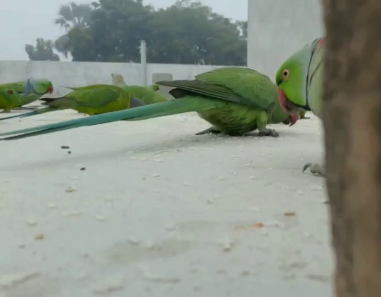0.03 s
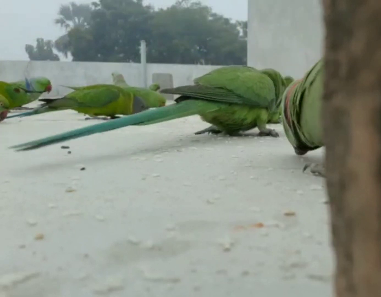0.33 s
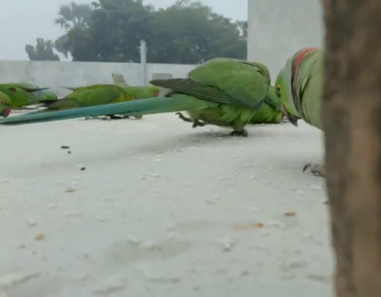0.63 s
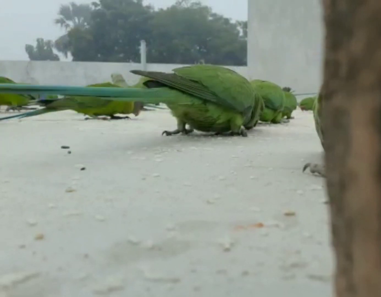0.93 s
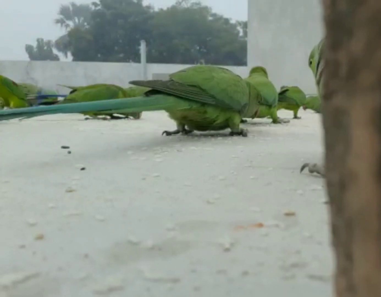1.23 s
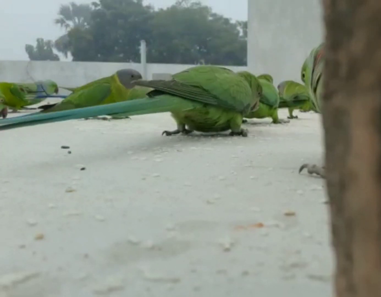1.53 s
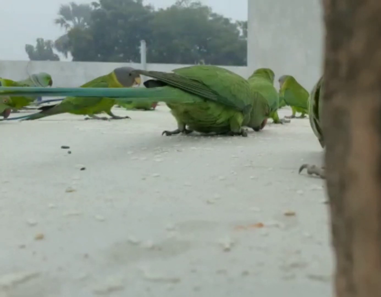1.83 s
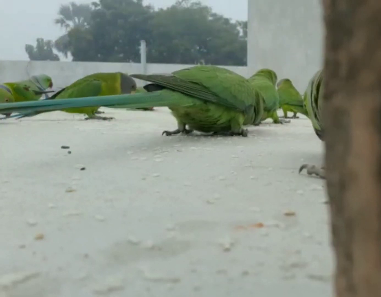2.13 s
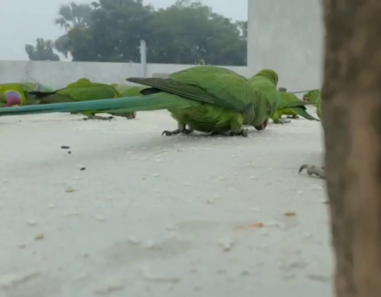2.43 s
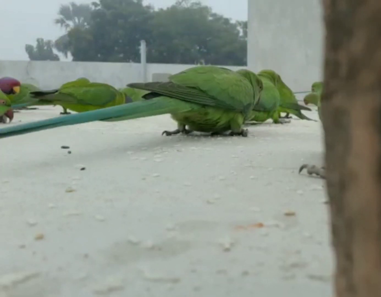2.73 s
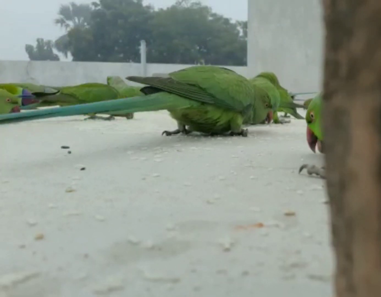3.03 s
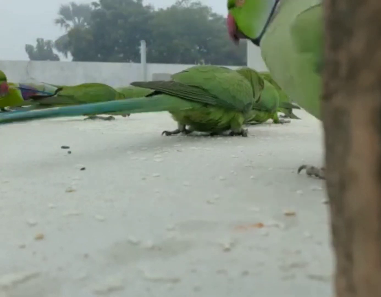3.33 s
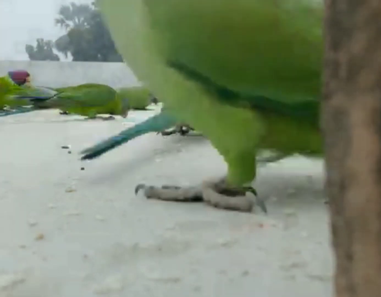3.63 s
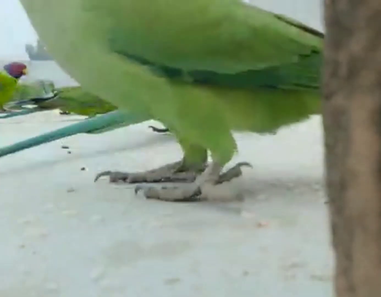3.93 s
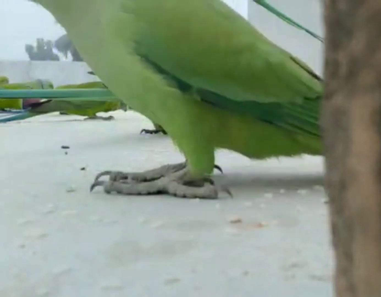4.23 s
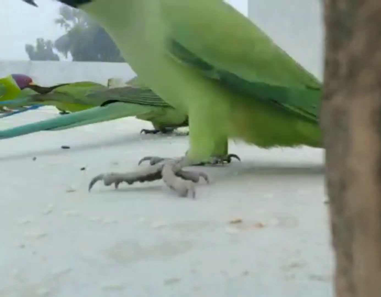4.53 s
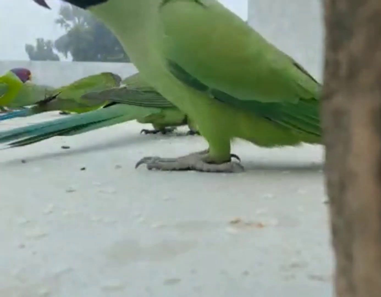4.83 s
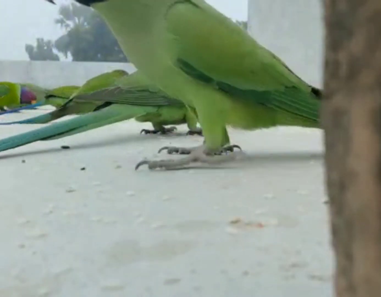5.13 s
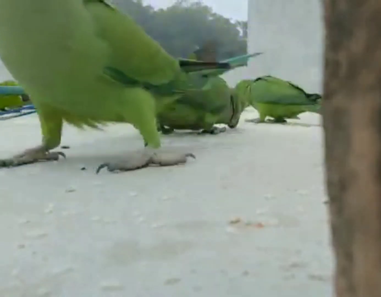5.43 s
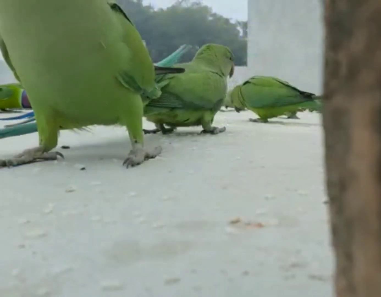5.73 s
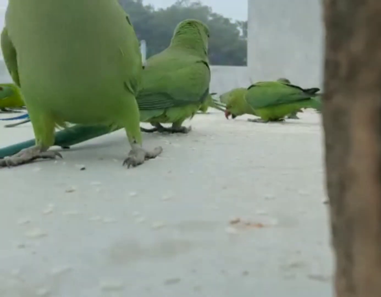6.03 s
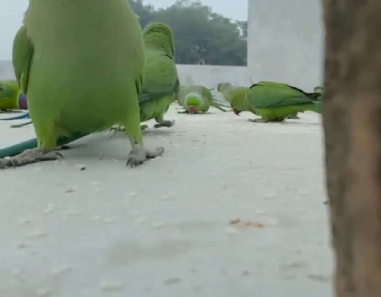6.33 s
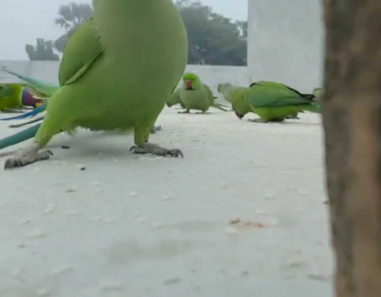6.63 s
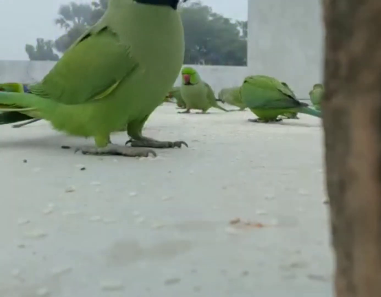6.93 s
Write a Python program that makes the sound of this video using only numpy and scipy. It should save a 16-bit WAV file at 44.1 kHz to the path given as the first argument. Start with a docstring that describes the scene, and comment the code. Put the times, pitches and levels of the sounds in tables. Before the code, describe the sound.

Soft, hoarse parakeet warbles and a short hiss open over a gentle outdoor breeze and dry ticks of beaks and claws on a hard floor. Three short squawks sweep upward with a slight wall echo, followed by hissing and trilling. Midway, wings flap close to the microphone in dull whooshes with feather crackle and low puffs of air. More ticks, a hiss and brief chirps finish, over a faint distant hum.

```python
"""Parakeets feed on a concrete terrace in a light breeze. From the start one hisses and warbles softly,
its syrinx tones coloured by the throat; beaks crack seeds and claws tick throughout. A foot scuffs at
0.8 s. At 1.1-1.7 s, over a faint far drone, another bird gives three rising squawks that echo off walls.
A hiss, trills and quavers follow at 1.9-2.8 s. Wings flutter past in bouts at 3.1-4.9 s, stirring the air.
Near 6 s a second drone swells, and a last hiss leads into more warbled notes."""
import sys
import numpy as np
from scipy import signal
from scipy.fft import rfft, irfft
from scipy.io import wavfile
from scipy.ndimage import uniform_filter1d

SR = 44100
rng = np.random.default_rng(int(sys.argv[2]) if len(sys.argv) > 2 else 0)


def inscribe(sig):
    """Save sig as 16-bit PCM at rate SR to the path in sys.argv[1].

    A 1-D sig is mono; a 2-D sig holds one channel per row.
    Samples are clipped to [-1, 1] before scaling.
    """
    pcm = np.round(np.clip(np.atleast_2d(sig).T, -1, 1) * 32767)
    wavfile.write(sys.argv[1], SR, pcm.astype(np.int16))


N = 307818
TIME_S, FREQS_HZ = np.arange(N) / SR, np.fft.rfftfreq(N, 1 / SR)

# Two directions at the mic ports. Each row: frequency in Hz, left lead in radians, left over right in dB.
FROM_FLOOR = [(526, 0.5, 1), (879, -0.05, 6.5), (998, 4, 7), (1292, 3.5, -0.5), (1377, 3.5, 5.5),
              (1545, 2, 0.5), (2430, 0.87, -1), (3170, -2, 1), (4000, -1.5, -0.5), (5580, -2, 0),
              (5830, 2.5, 1.5), (7700, 0.37, 1), (9370, 2.5, 0), (11300, 1.5, -7)]
FROM_SQUAWKER = [(503, 4, -4), (810, -0.9, 5), (1075, 3, 6), (1740, 4, -5.5), (1940, 3.5, 0),
                 (2560, 4.5, -8), (2650, 3.5, -2), (3600, 5, 6.5), (4680, 10, -7.5), (4380, 15, -8),
                 (4500, 11, 7), (5330, 8.5, -1.5), (6150, 4.5, -2), (6600, 2, 1), (10600, 0.45, -4.5)]
# Wall reflections. Each row: delay in seconds, relative level in dB, right-port lag in seconds.
WALL_ECHOES = [(.015, -6, 0.027), (.025, -15, -0.0098), (.036, -42, -0.024), (.045, -43, .0003),
               (.072, -24, 0.0078), (.078, -22, 0.0074), (0.086, -21.5, 0)]
# Breeze strength. Each row: time in seconds, relative level in dB.
BREEZE = [(0, -1), (.7, 3), (2.4, -3), (3.0, 4.5), (4.7, -2.5), (5.4, -12.5), (6.35, -7.5), (6.98, -3.5)]
# Low, mid and high band of the air. Each row: level in dB, dB per dB of breeze, wake level at full
# flapping in dB, wake exponent, lumpiness in dB.
AIR_BANDS = [(-58.5, 1.5, -35.5, 1.17, 3.5), (-51.5, 0.31, -41, 1.02, 3.5), (-60, 0.29, -53, 0.26, 1.5)]
# Spectrum of the air. Each row: frequency in Hz, gain in dB.
AIR_COLOUR = [(15, -38), (25, -9), (101, -5), (207, -7), (354, -1.5), (790, 1.5), (1280, -6), (1500, -3.5),
              (2370, -12), (3350, -19), (3830, -19), (6200, -25.5), (7500, -24.5), (9300, -28.5),
              (11500, -28), (15000, -27)]
# Hisses. Each row: start, peak and end in seconds, peak level in dB, whistle's share of power 0-1.
HISSES = [(0, 0.04, 0.18, -33, 0.02), (1.88, 2, 2.8, -32.5, 0.15), (5.948, 6, 6.24, -35, 0.55)]
# Resonances of the hissing throat. Each row: frequency in Hz, width in Hz, gain in dB.
HISS_MODES = [(1035, 550, 4), (1480, 344, 12.5), (1500, 50, -12)]
# Warbled notes. Each row: start and length in seconds, first, middle and last pitch in Hz, level in dB,
# tilt in dB per harmonic.
NOTES = [(.107, 0.0077, 930, 790, 860, -22, -6.5), (.114, 0.052, 624, 466, 326, -32, -1.5),
         (.114, 0.013, 1910, 1895, 1750, -26.5, -27), (.37, .11, 589, 498, 472, -35.5, -3),
         (.42, 0.037, 992, 591, 700, -28, -10), (.577, .018, 550, 740, 990, -30.5, -7),
         (.682, 0.02, 695, 690, 1080, -34, -14), (.724, 0.071, 732, 510, 620, -37, -7),
         (2.284, 0.012, 1302, 1034, 956, -28, -5.5), (2.305, 0.016, 1295, 1080, 810, -27.5, -8),
         (2.327, 0.022, 1910, 2090, 1760, -37.5, -5), (2.389, 0.033, 2260, 1910, 2380, -29.5, -11),
         (2.481, 0.035, 1485, 1504, 1445, -30.5, -4.5), (2.539, 0.044, 1357, 1050, 870, -29, -5.5),
         (2.578, 0.021, 900, 818, 730, -27, -14), (2.596, .043, 753, 700, 875, -36.5, -11.5),
         (2.692, 0.084, 805, 630, 904, -35.5, -14), (3.069, 0.017, 940, 855, 840, -38, -16),
         (5.271, .0093, 830, 810, 895, -39.5, -29), (5.448, 0.018, 740, 670, 660, -42, -11),
         (6.138, 0.016, 905, 622, 1290, -13, -4.5), (6.1537, 0.02, 1650, 1755, 1600, -18, -27),
         (6.488, 0.04, 844, 464.5, 730, -30, -5.5), (6.527, 0.035, 837, 788, 720, -38, -7.5),
         (6.749, 0.0091, 613, 745, 900, -38.5, -7), (6.805, 0.033, 1258, 691.5, 480, -29.5, -2.5),
         (6.944, .036, 469, 853, 1270, -30.5, -2)]
# Runs of falling pips. Each row: first and last pip in seconds, pips per second, pitch in Hz,
# fall per pip in octaves, level in dB.
TRILLS = [(2.017, 2.133, 81, 830, .15, -34.5), (2.208, 2.264, 54, 1060, 0.86, -32)]
# Notes with repeated pitch dips. Each row: start and length in seconds, top, first dip and last dip in Hz,
# first and last level in dB, tilt in dB per harmonic.
QUAVERS = [(2.354, .037, 1623, 991, 717, -26, -22.5, -9), (2.424, .058, 1644, 1518, 1047, -25.5, -21.5, -3)]
# Each bird's throat and beak filter, and its syrinx airflow. Each row: frequency in Hz, gain in dB.
WARBLE_THROAT = [(300, 4), (700, 5.5), (1000, 10.5), (1500, 8.5), (2300, 0), (2800, -8.5), (3300, 0.5),
                 (3900, -18), (4600, -7), (5600, -12), (7500, -10), (10000, -35)]
WARBLE_RUSH = [(150, -50), (450, -13), (900, 3), (2200, -9), (3000, -5), (5000, -17), (7800, -11),
               (10000, -28), (14000, -35)]
SQUAWK_THROAT = [(700, -4), (1600, 6.5), (3200, 4.5), (4100, 9.5), (4700, 0.5), (5300, -1), (5750, -12.5),
                 (6300, 3.5), (7200, -2.5), (8400, -4), (9500, -13.5), (10800, 0.5), (12200, -4),
                 (14000, -55)]
SQUAWK_RUSH = [(200, -40), (600, -12), (1300, -12), (2500, -17), (4000, -12), (5500, -7), (7500, 4),
               (9500, -13), (11500, -12), (14000, -39)]
# Seed cracks and claw ticks, relative levels. Each row: start in seconds, snap in dB, snap pitch in Hz,
# knock in dB, splinters in dB.
TICKS = [(0.2136, -18, 7330, -30, -36.5), (.3189, -35.5, 7900, -57, -44), (.3287, -43, 8150, -44, -48),
         (.586, -36, 7000, -45, -34), (.598, -35, 7830, -38, -35), (.8108, -30.5, 7640, -35, -39),
         (0.8424, -20, 7300, -32, -32.5), (1.2783, -37, 7500, -35.5, -40),
         (2.2103, -30.5, 7360, -47, -38.5), (2.2337, -38, 7800, -58, -38.5), (2.854, -32, 7600, -37, -32.5),
         (3.552, -41, 3300, -35, -57), (3.821, -38, 3540, -36, -45), (3.974, -40, 7460, -54, -45),
         (4.35, -43, 3060, -35.5, -51), (4.584, -48, 3080, -40, -42), (4.885, -33.5, 7960, -53, -43),
         (4.9417, -56, 3120, -40, -45), (5.0364, -44, 7650, -40.5, -39.5),
         (5.1184, -34, 7300, -35.5, -38.5), (5.1775, -48, 3970, -39, -37.5),
         (5.4974, -52, 3250, -35.5, -44), (5.5371, -46, 7800, -34, -45), (5.689, -45, 7000, -37, -37.5),
         (5.7339, -55, 3540, -39.5, -45), (6.1408, -42, 5350, -29, -40), (6.3003, -40, 5530, -45, -39.5),
         (6.446, -43, 7100, -38.5, -50), (6.5747, -34.5, 4380, -46, -41.5), (6.616, -49, 7360, -36, -37),
         (6.636, -48, 2400, -41, -59), (6.703, -42, 7440, -50, -50), (6.879, -31, 3760, -41, -28.5)]
# Beak and seed ringing on the floor. Each row: nominal frequency in Hz, gain in dB, T60 in seconds.
KNOCK_MODES = [(1050, -23, 0.065), (1313, 6.5, 0.016), (1750, 4, 0.0077), (2350, -24, 0.064),
               (4200, -43, 0.0013)]
# Far drones. Each row: peak time and spread in seconds, frequency in Hz, peak level in dB.
DRONES = [(1.15, 0.83, 275, -53), (5.85, 0.63, 391, -57.5)]
# Foot scuff envelope. Each row: time in seconds, level in dB.
SCUFF_ENVELOPE = [(0.761, -65), (0.808, -47.5), (0.891, -58.5), (1.05, -76)]
# One rising curve per squawk. Each row: time in seconds, pitch in Hz, level in dB.
SQUAWK_CURVES = [
    [(1.110, 1540, -29), (1.117, 1617, -20.5), (1.130, 2050, -27), (1.140, 2092, -26), (1.165, 2142, -22.5),
     (1.186, 2560, -14), (1.189, 3020, -22.5), (1.201, 3260, -18), (1.213, 4220, -21.5)],
    [(1.348, 687, -30), (1.356, 850, -24.5), (1.363, 1480, -29), (1.373, 1544, -18), (1.385, 1857, -18),
     (1.405, 2038, -18), (1.420, 2224, -20.5), (1.431, 2575, -17.5), (1.441, 2670, -21), (1.444, 3110, -25),
     (1.450, 3250, -21.5), (1.461, 4420, -18)],
    [(1.598, 682, -34), (1.605, 855, -25), (1.612, 1595, -30.5), (1.624, 1673, -21.5), (1.638, 1948, -20.5),
     (1.664, 2130, -20.5), (1.683, 2518, -21), (1.689, 2897, -26.5), (1.700, 3065, -26), (1.707, 3680, -25),
     (1.720, 4860, -29)],
]
# Modulation depth 0-1, one per squawk.
SQUAWK_RASP = [.08, 0.14, .35]
# Squawk registers, purer when high. Each row: pitch in Hz, tilt in dB per harmonic.
REGISTERS = [(1500, -7), (2100, -4), (2600, -5), (3100, -9.5), (5400, -23)]
# Whistle closing the first squawk. Each row: start and length in seconds, first, middle and last pitch
# in Hz, level in dB.
WHISTLE_BENDS = [(1.216, .022, 5150, 5280, 5270, -22.5), (1.238, .025, 5320, 5510, 5300, -26)]
# Air puffs on the mic. Each row: start in seconds, nominal peak in dB, frequency in Hz.
PUFFS = [(2.651, -39.5, 60), (2.761, -36.5, 60.4), (2.851, -32, 69.6), (2.952, -40, 63.4),
         (3.138, -33, 75.5), (3.528, -12.5, 56), (3.566, -25, 70), (4.467, -28, 66), (4.727, -33.5, 69)]
# Flapping bouts. Each row: first and last stroke in seconds, first and last level in dB.
BOUTS = [(3.133, 3.172, -45, -39), (3.239, 3.283, -34.5, -40), (3.402, 3.495, -41.5, -34.5),
         (3.533, 3.616, -20.5, -21), (3.662, 3.759, -26, -28), (3.794, 3.993, -19, -34.5),
         (4.05, 4.181, -30.5, -32), (4.227, 4.456, -27.5, -26), (4.55, 4.56, -33, -36),
         (4.624, 4.665, -37.5, -43.5), (4.724, 4.759, -32, -37), (4.817, 4.929, -37, -43)]
# Flight-feather claps. Each row: start in seconds, level in dB.
CLAPS = [(3.529, -28), (3.71, -23), (3.784, -28), (3.799, -27), (4.124, -23), (4.267, -35), (4.359, -28),
         (4.45, -31)]
# Spectrum of a wing stroke. Each row: frequency in Hz, gain in dB.
WING_COLOUR = [(24, -41), (40, -2.5), (70, -10), (170, -21), (258, 5), (329, -4.5), (372, -3.5), (608, -12),
               (758, -8.5), (1360, -29), (1660, -46), (3380, -48), (4010, -41), (5130, -110), (14000, -50)]

FULL_FLAP_DB = -24  # mean stroke level at full flapping


def amp(db):
    """Decibels to gain."""
    return 10 ** (np.asarray(db) / 20)


def unit(x):
    """Scale to rms 1."""
    return x / np.sqrt(np.mean(x ** 2) + 1e-20)


def lookup(table, hz, column=1):
    """Interpolate a column over log frequency."""
    columns = np.transpose(table)
    return np.interp(np.log(hz + 1), np.log(columns[0] + 1), columns[column])


def add(mix, start_s, sound):
    """Mix a sound in at start_s."""
    part = mix[max(round(start_s * SR), 0):][:len(sound)]
    part += sound[:len(part)]


def noise(gain):
    """Unit-rms noise with the given spectral shape."""
    real, imaginary = rng.standard_normal((2, len(FREQS_HZ)))
    return unit(irfft((real + 1j * imaginary) * gain, N))


def band_noise(hz, width_hz):
    """Noise in a Gaussian band."""
    return noise(np.exp(-((FREQS_HZ - hz) / width_hz) ** 2))


def waver(hz):
    """Random wander, mostly slower than hz."""
    return band_noise(0, hz)


def beats(first_s, last_s, per_s):
    """Evenly spaced times at about the given rate."""
    return np.linspace(first_s, last_s, round(abs(last_s - first_s) * per_s) + 1)


def ports(x, direction):
    """Phase and level differences between the two mic ports."""
    lead_rad, balance_db = lookup(direction, FREQS_HZ), lookup(direction, FREQS_HZ, column=2)
    half = np.exp(.5j * lead_rad) * amp(balance_db / 2)
    pair = np.array([half, 1 / half])
    return irfft(rfft(x) * pair / np.sqrt(np.mean(abs(pair) ** 2, axis=0)), N)


def terrace(x, direction, echo_db, tail_db, t60_s=0.4, cutoff_hz=4800, dulling_s=0.25):
    """Direct sound, wall echoes that dull with distance, and a thin scattered tail."""
    t = np.arange(SR // 2) / SR
    tail = rng.standard_normal((2, len(t))) * (t > .004) * amp(-60 * t / t60_s)
    tail = signal.lfilter(*signal.butter(3, cutoff_hz, fs=SR), tail)
    response = amp(tail_db) * tail / np.linalg.norm(tail[0])
    for delay_s, db, lag_s in WALL_ECHOES:
        lowpass = signal.butter(2, cutoff_hz / (1 + delay_s / dulling_s), fs=SR)
        echo = signal.lfilter(*lowpass, signal.unit_impulse(len(t)))
        for port, arrival_s in zip(response, (delay_s, delay_s + lag_s)):
            add(port, arrival_s, amp(db + echo_db) * echo)
    return ports(x, direction) + signal.fftconvolve(x[None], response, axes=1)[:, :N]


def air(strokes, wake_s=0.18, diffuse_gain=0.73):
    """Rumble, hush and rustle of open air, driven by the breeze and the wake of the wings."""
    breeze_db = np.interp(TIME_S, *np.transpose(BREEZE))
    wake = abs(uniform_filter1d(strokes, round(wake_s * SR))) / amp(FULL_FLAP_DB)
    low = 1 / (1 + (FREQS_HZ / 195) ** 6)
    high = 1 / (1 + (3200 / (FREQS_HZ + 1)) ** 4)
    mid = (1 - low) * (1 - high)
    out = np.zeros((2, N))
    for band, (db, follow, wake_db, exponent, lumps_db) in zip([low, mid, high], AIR_BANDS):
        colour = band * amp(lookup(AIR_COLOUR, FREQS_HZ))
        pair = ports(noise(colour), FROM_FLOOR) + diffuse_gain * np.array([noise(colour), noise(colour)])
        level = np.hypot(amp(db + follow * breeze_db), amp(wake_db) * wake ** exponent)
        out += unit(pair) * level * amp(1.5 + lumps_db * waver(hz=25))
    return out


def hisses(whistle_hz=1556, sag_hz=68.7, edge_db=-18.5, jitter=0.0214):
    """Rough air in the throat resonances swells and fades around a thin, sagging whistle."""
    throat = sum(amp(db) / (1 + ((FREQS_HZ - hz) / (width_hz / 2)) ** 2) for hz, width_hz, db in HISS_MODES)
    rasp = unit(noise(throat) * amp(2.4 * waver(hz=80)))
    wobble = 1 + jitter * waver(hz=137)
    out = np.zeros(N)
    for start_s, peak_s, end_s, db, share in HISSES:
        position = np.interp(TIME_S, [start_s, peak_s, end_s], [-1, 0, 1])
        hz = (whistle_hz - sag_hz * position) * wobble
        whistle = unit(np.sin(2 * np.pi * np.cumsum(hz) / SR))
        envelope = amp(db + edge_db * position ** 2) * (abs(position) < 1)
        out += envelope * (np.sqrt(share) * whistle + np.sqrt(1 - share) * rasp)
    return out


def syrinx(hz, level_db, tilt_db, throat, jitter, shimmer, harmonics=9):
    """Harmonics on an unsteady pitch, coloured by the throat."""
    wobble, flutter = (unit(uniform_filter1d(row, 24)) for row in rng.standard_normal((2, len(hz))))
    phase = 2 * np.pi * np.cumsum(hz * (1 + jitter * wobble)) / SR
    k = np.arange(1, harmonics + 1)[:, None]
    gains = amp(tilt_db * k + lookup(throat, k * hz)) * (k * hz < SR / 2)
    gains /= np.sqrt(np.sum(gains ** 2, axis=0) / 2)
    return amp(level_db) * (1 + shimmer * flutter) * np.sum(gains * np.sin(k * phase), axis=0)


def rasping(voice, depth, rate_hz, wander=0.257):
    """A second, unsteady vibration in the syrinx modulates the voice."""
    hz = rate_hz * (1 + wander * unit(uniform_filter1d(rng.standard_normal(len(voice)), 150)))
    return voice * (1 + depth * np.sin(2 * np.pi * np.cumsum(hz) / SR)) / np.sqrt(1 + depth ** 2 / 2)


def airy(voice, colour, rush_db=-27):
    """Voice plus syrinx airflow that tracks its level."""
    effort = np.sqrt(abs(uniform_filter1d(voice ** 2, size=200)))
    return voice + amp(rush_db) * effort * noise(amp(lookup(colour, FREQS_HZ)))


def gated(voice, both_edges_s=0.005):
    """The voice opens and closes quickly."""
    return voice * signal.windows.tukey(len(voice), min(1, both_edges_s * SR / len(voice)))


def scoop(length_s, pitches_hz):
    """Smooth bend through a first, middle and last pitch."""
    parabola = np.polyfit([0, .5, 1], np.log(pitches_hz), 2)
    return np.exp(np.polyval(parabola, np.linspace(0, 1, round(length_s * SR))))


def warble(hz, db, tilt_db, jitter=.028, swell_db=4.0):
    """One slightly hoarse note, swelling in the middle."""
    arch = np.sin(np.linspace(0, np.pi, len(hz))) - 2 / np.pi
    voice = syrinx(hz, db + swell_db * arch, tilt_db, WARBLE_THROAT, jitter, shimmer=0.067)
    return gated(rasping(voice, depth=.4 * amp(tilt_db), rate_hz=170))


def warbler(pip_s=.0085, pip_spread_db=3.5, dips_per_s=52, dip_swell_db=8.5):
    """Soft song: scooped notes, trills of pips, and quavers that are louder in each pitch dip."""
    out = np.zeros(N)
    for start_s, length_s, *pitches_hz, db, tilt_db in NOTES:
        add(out, start_s, warble(scoop(length_s, pitches_hz), db, tilt_db))
    for first_s, last_s, per_s, hz, octaves, db in TRILLS:
        pip_hz = hz * 2 ** (octaves * np.linspace(.5, -.5, round(pip_s * SR)))
        for start_s in beats(first_s, last_s, per_s):
            add(out, start_s, warble(pip_hz, db + pip_spread_db * rng.standard_normal(), tilt_db=-15))
    for start_s, length_s, top_hz, first_hz, last_hz, first_db, last_db, tilt_db in QUAVERS:
        t = np.arange(0, length_s, 1 / SR)
        dip = np.sin(np.pi * dips_per_s * t) ** 2
        hz = top_hz * (np.linspace(first_hz, last_hz, len(t)) / top_hz) ** dip
        db = np.linspace(first_db, last_db, len(t)) + dip_swell_db * (dip - 1)
        add(out, start_s, warble(hz, db, tilt_db, jitter=0.049))
    return airy(out, WARBLE_RUSH)


def tick(snap_db, snap_hz, knock_db, splinter_db, snap_s=0.00037):
    """Husk or claw: a ringing snap, dry splinters and a short dull knock."""
    t = np.arange(1500) / SR
    burst = t / snap_s * np.exp(1 - t / snap_s)
    snap = amp(snap_db) * np.sin(2 * np.pi * snap_hz * t)
    bandpass = signal.butter(2, [1800, 10000], "band", fs=SR)
    splinters = unit(signal.lfilter(*bandpass, rng.standard_normal(len(t))))
    detunes = rng.uniform(0.73, 1.345, len(KNOCK_MODES))
    knock = sum(amp(db - 60 * t / t60_s) * np.sin(2 * np.pi * hz * detune * t)
                for (hz, db, t60_s), detune in zip(KNOCK_MODES, detunes))
    return burst * (snap + amp(splinter_db) * splinters) + amp(knock_db) * knock


def feeding(near_gain_db=2.5, flock_db=-53.0, pecks=130):
    """Loud cracks nearby; faint random pecks from the flock."""
    near, flock = np.zeros((2, N))
    for start_s, *crack in TICKS:
        add(near, start_s, tick(*crack))
    for when, size, pitch, body in rng.random((pecks, 4)):
        db = flock_db + 7 * size ** 2
        add(flock, when * N / SR, tick(db, 3000 + 5000 * pitch, db + 6 * body, db))
    return amp(near_gain_db) * near + flock


def drones(width_hz=65):
    """Narrow bands of distant hum swell and fade."""
    return sum(band_noise(hz, width_hz) * amp(db) * np.exp(-((TIME_S - peak_s) / spread_s) ** 2)
               for peak_s, spread_s, hz, db in DRONES)


def scuff():
    """Claws drag over grit: a grainy scratch."""
    grit = band_noise(hz=4200, width_hz=1100) * amp(4.3 * waver(hz=200))
    times_s, db = np.transpose(SCUFF_ENVELOPE)
    return unit(grit) * np.interp(TIME_S, times_s, amp(db), left=0, right=0)


def squawker():
    """Three harsh upward sweeps that break between registers; the first ends in a thin whistle."""
    out = np.zeros(N)
    for curve, rasp in zip(SQUAWK_CURVES, SQUAWK_RASP):
        times_s, pitches_hz, levels_db = np.transpose(curve)
        t = np.arange(times_s[0], times_s[-1], 1 / SR)
        hz, db = np.interp(t, times_s, pitches_hz), np.interp(t, times_s, levels_db)
        tilt_db = lookup(REGISTERS, hz)
        voice = syrinx(hz, db, tilt_db, SQUAWK_THROAT, jitter=.036 * amp(tilt_db), shimmer=.1)
        add(out, times_s[0], gated(rasping(voice, rasp, rate_hz=330)))
    for start_s, length_s, *pitches_hz, db in WHISTLE_BENDS:
        hz = scoop(length_s, pitches_hz)
        whistle = syrinx(hz, db, 0, SQUAWK_THROAT, jitter=.006, shimmer=.1, harmonics=1)
        add(out, start_s, gated(whistle))
    return airy(out, SQUAWK_RUSH)


def puffs(spread_db=9.0, rise_cycles=0.37):
    """Air pushed by wings thumps the mic; each eddy meets the two ports differently."""
    out = np.zeros((2, N))
    t = np.arange(4000) / SR
    for start_s, db, hz in PUFFS:
        age = t * hz / rise_cycles
        for port in out:
            size, turn = rng.uniform(-1.1, 1, 2)
            envelope = amp(db + spread_db * size) * age * np.exp(1 - age)
            add(port, start_s, envelope * np.sin(2 * np.pi * hz * t + 0.35 * turn))
    return out


def wing_strokes(per_s=22, rise_s=0.0076, fall_s=0.0093, clap_s=0.0023, uneven_db=1.44):
    """Force envelope of flapping: bouts that swell or fade, plus sharp claps."""
    strokes = np.zeros(N)
    t = np.arange(-2000, 4000) / SR
    stroke = 1 / np.cosh(t / np.where(t < 0, rise_s, fall_s))
    for first_s, last_s, first_db, last_db in BOUTS:
        peaks_s = beats(first_s, last_s, per_s)
        for peak_s, db in zip(peaks_s, np.linspace(first_db, last_db, len(peaks_s))):
            add(strokes, peak_s + t[0], amp(db + uneven_db * rng.standard_normal()) * stroke)
    for start_s, db in CLAPS:
        add(strokes, start_s, amp(db) * np.exp(-t[t >= 0] / clap_s))
    return strokes


def wings(strokes, diffuse_db=-8.5):
    """Each stroke moves air in a dull whoosh."""
    colour = amp(lookup(WING_COLOUR, FREQS_HZ))
    direct = ports(strokes * noise(colour), FROM_FLOOR)
    return direct + amp(diffuse_db) * strokes * np.array([noise(colour), noise(colour)])


def feathers(strokes, gain_db=-25, grains_per_s=1500, highpass_hz=2500, lowpass_hz=4200):
    """Stiff quills brush past each other in every stroke: a fine dry crackle."""
    size_db = 4 * np.minimum(rng.exponential(1, N), 3)
    grains = (rng.random(N) < grains_per_s / SR) * rng.choice([-1, 1], N) * amp(size_db)
    colour = FREQS_HZ / (FREQS_HZ + highpass_hz) / (1 + (FREQS_HZ / lowpass_hz) ** 2)
    crackle = unit(irfft(rfft(grains) * colour, N))
    effort = (abs(strokes) / amp(FULL_FLAP_DB)) ** 0.77
    return amp(gain_db + FULL_FLAP_DB) * effort * crackle


def scene():
    """Birds near and far on the open terrace, in stereo."""
    strokes = wing_strokes()
    far = terrace(squawker(), FROM_SQUAWKER, echo_db=-4.5, tail_db=-27)
    floor = warbler() + hisses() + feeding() + scuff() + feathers(strokes)
    near = terrace(floor, FROM_FLOOR, echo_db=-13, tail_db=-35.5)
    return far + near + wings(strokes) + puffs() + air(strokes) + drones()


def record(dry, bass_hz=42, edge_hz=14350):
    """Mic bass roll-off and a steep treble limit."""
    thinned = signal.sosfilt(signal.butter(3, bass_hz, "high", fs=SR, output="sos"), dry)
    lowpass = signal.firwin(511, edge_hz, window=("kaiser", 8), fs=SR)
    return signal.oaconvolve(thinned, lowpass[None], "same")


dry = scene()
out = record(dry)
inscribe(out)
```